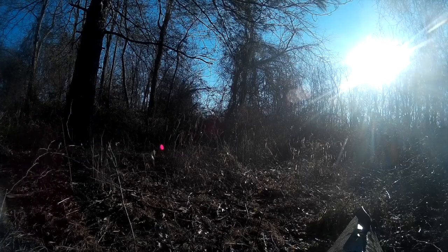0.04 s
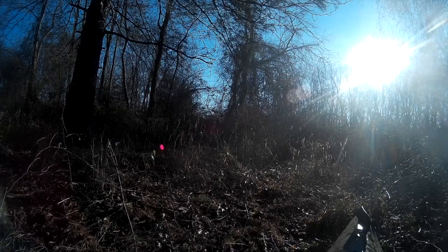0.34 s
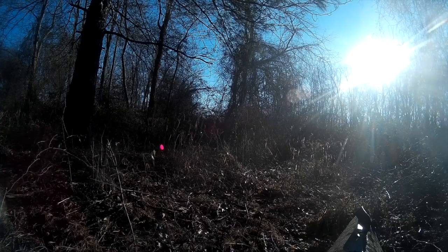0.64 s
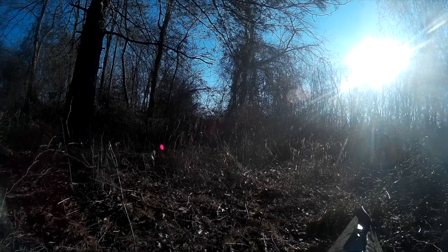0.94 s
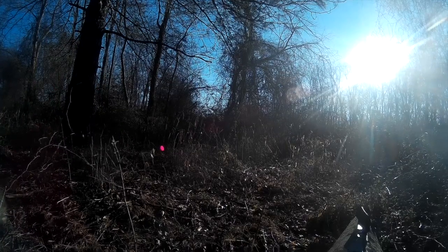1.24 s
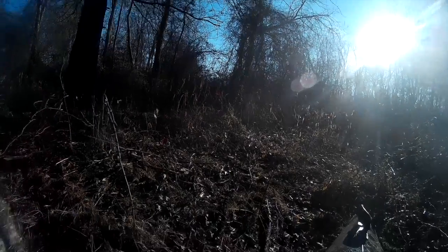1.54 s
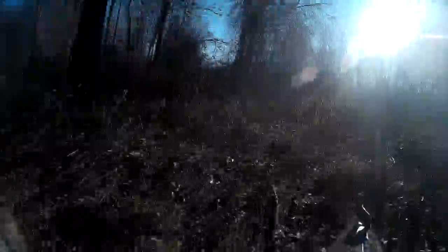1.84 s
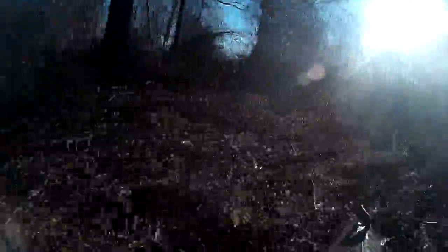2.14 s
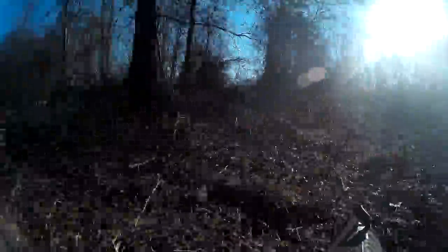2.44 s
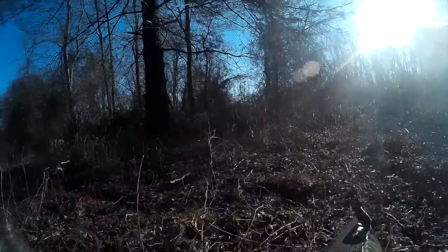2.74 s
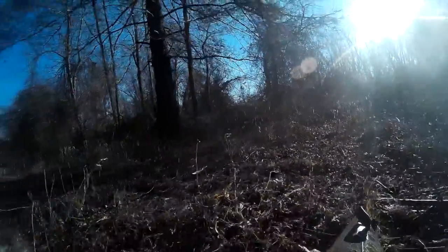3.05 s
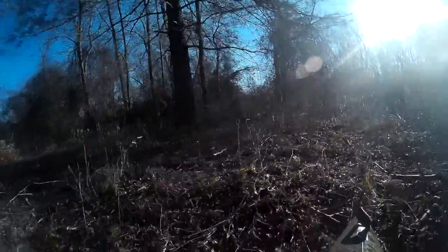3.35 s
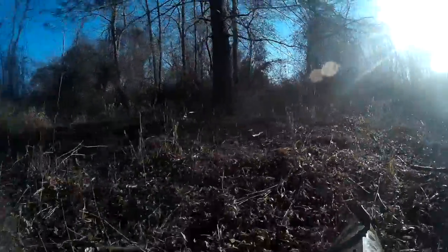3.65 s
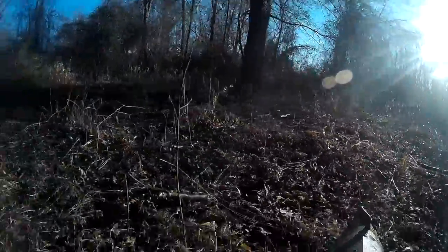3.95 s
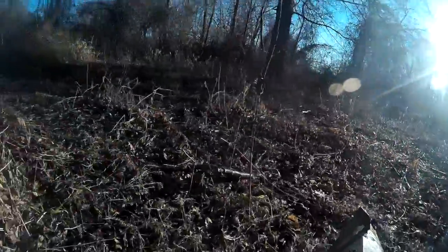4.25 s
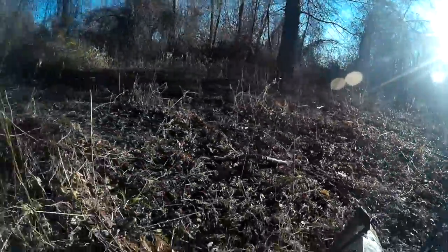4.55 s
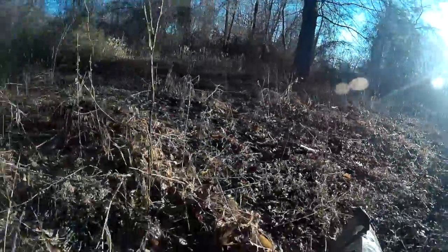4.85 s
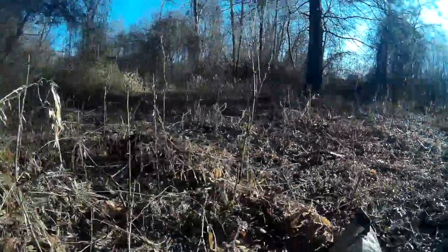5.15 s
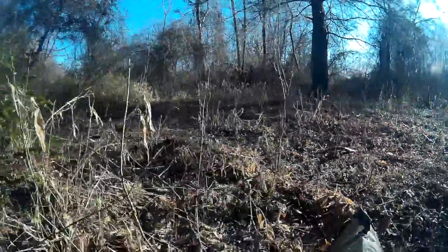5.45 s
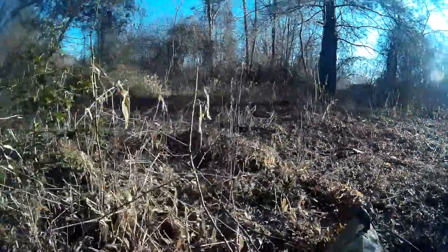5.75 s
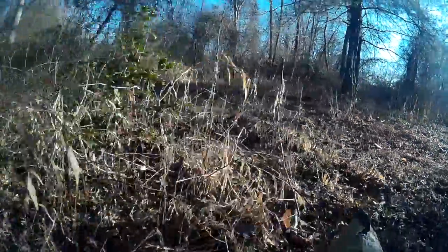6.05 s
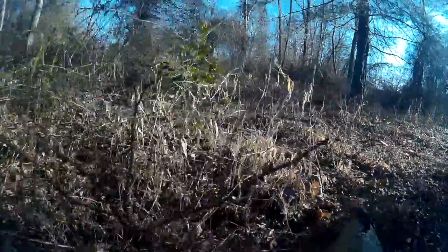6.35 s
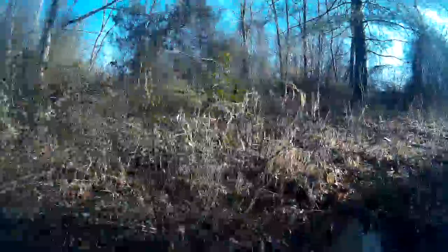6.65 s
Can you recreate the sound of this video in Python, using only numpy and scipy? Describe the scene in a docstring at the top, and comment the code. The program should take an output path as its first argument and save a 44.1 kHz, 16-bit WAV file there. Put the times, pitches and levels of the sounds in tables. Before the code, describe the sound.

A hollow plastic boat is dragged over dry leaves and brush, rumbling and thumping while twigs knock, scrape and snap very close.

```python
"""In still woods, a plastic kayak is hauled over dry leaves and brush. The microphone rides on the boat,
inside a closed camera case, so every contact is very close. The hollow hull rumbles over the ground and
booms on bumps; twigs knock and scrape along it and ring the case. Each heap of brush lifts the boat and
crushes twigs; leaves crackle faintly through the case wall."""
import sys
import numpy as np
from scipy import signal
from scipy.fft import rfft, irfft, next_fast_len
from scipy.io import wavfile
from scipy.ndimage import uniform_filter1d

SR = 44100
rng = np.random.default_rng(int(sys.argv[2]) if len(sys.argv) > 2 else 0)


def int16_out(signal):
    """Quantize to a 16-bit WAV file."""
    q = np.round(np.clip(np.atleast_2d(signal).T, -1, 1) * 32767)
    wavfile.write(sys.argv[1], SR, q.astype(np.int16))


N = 300321
TIME = np.arange(N) / SR

# Tone colours at the microphone. Each row: frequency in Hz, relative level in dB.
WOODS_SPECTRUM = [(12, -37.5), (20, -0.5), (86, 4.5), (298, -3.5), (1510, -16), (3760, -18.5),
                  (4080, -18), (4430, -19), (13000, -20.5), (14500, -27)]
RUMBLE_SPECTRUM = [(40, -17), (90, -6), (140, -2.5), (190, 4), (250, -3.5), (290, -6.5), (345, -4.5),
                   (450, -11.5), (560, -22.5), (680, -18.5), (800, -29.5), (1500, -33.5), (3000, -56.5)]  # the hull on lumpy ground
HEAVE_SPECTRUM = [(10, -18), (25, -3.5), (46, 2.5), (70, 3.5), (105, -6), (160, -17), (400, -76.5),
                  (1000, -72)]  # the whole boat heaving
RUB_SPECTRUM = [(300, -2), (600, 0), (770, -13.5), (1000, -1.5), (1250, -1), (1550, -7.5), (1900, -8),
                (2300, -17), (2950, -13.5), (3500, -22.5), (5300, -23.5), (8000, -37.5)]  # leaves rubbing underneath
LEAF_SPECTRUM = [(700, -24), (2000, -5), (3000, 0.5), (4500, 1.5), (5500, 5), (7200, 3), (8400, -1),
                 (9300, -2), (10500, 5), (12200, -2), (13500, -21.5), (15000, -9)]  # leaves crackling
SNAP_SPECTRUM = [(700, -10.5), (2500, -5.5), (5500, -1.5), (7800, 2), (9300, 0.5), (11000, 3.5), (12500, 2),
                 (14500, -11)]  # a stalk breaking

# Resonances of boat and case. Each row: frequency in Hz, width in Hz, relative level in dB.
HULL_MODES = [(109, 45, -10), (137.2, 66, -3.5), (192.6, 58, -4), (231.4, 97, -7), (340, 73, -8),
              (436, 173, -12), (566, 410, -19), (694, 210, -26.5)]
DECK_MODES = [(422, 260, 0.00079), (626, 326, 0)]
CASE_LOW_MODES = [(975, 220, -5), (1144, 433, 1.5), (1340, 313, 1.5), (1670, 384, -1), (1900, 315, 2)]
CASE_MID_MODES = [(2910, 610, 1), (3071, 524, 3.3), (3161, 730, 0.67)]
CASE_HIGH_MODES = [(3920, 330, -7), (4095, 293, -2), (4850, 400, -1.5), (5117, 349, 1.5),
                   (6300, 2200, -16.5), (6564, 490, -10.5), (8170, 700, -10.5), (9740, 900, -12.5)]
CRACK_MODES = [(1400, 2100, -1.5), (4440, 1030, 4.5), (6160, 2300, -6), (9050, 4000, -15)]  # the case under a brittle twig

# Effort of the haul. Each row: time in seconds, relative level in dB.
HAUL_EFFORT = [(0.85, -87), (1.35, -63), (1.53, -56.5), (1.86, -55.5), (2.03, -43), (2.18, -42.5),
               (2.33, -39), (2.86, -45.5), (3.09, -44.5), (3.46, -40.5), (3.57, -36.5), (3.77, -36.5),
               (4.15, -41.5), (4.58, -41.5), (4.68, -46), (4.97, -41.5), (5.08, -41.5), (5.27, -32),
               (5.35, -35), (5.48, -41.5), (5.63, -50), (5.85, -48), (6.03, -42), (6.23, -43),
               (6.58, -45.5), (6.81, -42.5)]
# Heaps of brush. Each row: start and length in seconds, boat lift and twig crushing in relative dB.
BRUSH_HEAPS = [(0.941, 0.083, -48.5, -71.5), (1.382, 0.081, -35, -53), (1.822, 0.29, -40, -62),
               (2.014, 0.046, -43, -57.5), (2.291, 0.023, -28.5, -40), (2.393, 0.025, -40, -42.5),
               (2.662, 0.066, -36.5, -54), (3.054, 0.052, -35.5, -62), (3.349, .12, -32, -47.5),
               (3.49, 0.16, -26.5, -38), (3.736, 0.1, -59, -42.5), (3.918, .35, -51, -42.5),
               (4.32, 0.2, -54, -48.5), (4.581, 0.082, -35.5, -48), (4.854, 0.25, -34, -49),
               (5.209, .16, -30, -41), (5.8, 0.39, -42, -62), (6.258, 0.068, -34, -50.5),
               (6.509, .06, -44, -51.5), (6.719, 0.099, -38, -60.5)]
# Stalks wiping the side. Each row: start and length in seconds, first and last pitch in Hz, level in dB.
STALK_SWISHES = [(2.861, 0.065, 1165, 1290, -58), (3.291, 0.14, 1273, 1684, -52.5),
                 (6.267, 0.0192, 1088, 1220, -40)]
# The loudest dry stalks breaking. Each row: start in seconds, relative level in dB.
STALK_SNAPS = [(1.398, -48), (1.456, -52.5), (1.506, -58), (2.325, -53), (2.3627, -54), (2.38, -50),
               (2.434, -50), (3.3621, -54), (3.4042, -55), (3.5033, -43), (3.5277, -43.5), (3.594, -41),
               (3.607, -41), (3.6628, -38), (3.7019, -44.5), (3.7928, -50), (3.9722, -45.5), (4.0384, -47),
               (4.148, -47), (4.2416, -43), (4.5027, -38), (4.999, -49), (5.0528, -50), (5.0924, -48),
               (5.292, -38), (5.3056, -41), (5.3146, -39.5), (5.377, -45), (5.396, -46), (5.4433, -45),
               (5.4579, -48.5), (6.2765, -48)]
# Stems sliding along the hull. Each row: start and length in seconds, relative level in dB.
STEM_SCRAPES = [(3.928, 0.012, -41), (3.938, 0.031, -28.5), (4.011, 0.017, -39), (4.047, 0.0094, -37),
                (4.087, 0.023, -47), (4.125, 0.024, -45), (4.177, .014, -29), (4.193, 0.024, -35.5),
                (4.236, 0.0436, -34.5), (4.437, 0.015, -35), (4.447, 0.01, -26.5), (4.888, 0.0057, -45.5)]
# Twigs cracking against the case. Each row: start in seconds, level of the loudest 2 ms in dB.
TWIG_CRACKS = [(1.3985, -28), (2.3025, -45), (3.6306, -28), (3.6622, -25)]
# Roots under the hull. Each row: start in seconds, level in dB, length of the push in seconds,
# brightness in dB per octave.
ROOT_BUMPS = [(0.94, -56, 0.056, 6), (1.394, -29.5, 0.012, -6), (1.442, -35, 0.028, 2.5),
              (1.846, -48.5, 0.062, 3), (2.04, -40.5, 0.051, 3.5), (2.298, -34.5, 0.062, -7.5),
              (2.668, -39.5, 0.072, 6), (3.1, -35.5, 0.0173, 3), (3.499, -39, 0.031, 10),
              (4.596, -27.5, 0.045, 4.5), (4.673, -38.5, 0.036, 8.5), (5.203, -20, 0.04, -3),
              (6.264, -30.5, 0.066, 0), (6.542, -39.5, 0.034, 1.5)]
# Drops on the keel. Each row: start in seconds, peak in dB.
KEEL_THUDS = [(1.4003, -13.5), (1.465, -19), (2.304, -25), (3.532, -15), (3.576, -21.5), (5.254, -13.5)]
# Twigs striking the boat. Each row: time in seconds, relative level in dB, leading tone in Hz,
# hardness in dB, wait for the first rebound in seconds (0 for none).
TWIG_KNOCKS = [(1.4117, -45, 1260, -16, 0), (1.4484, -24, 1320, -9.5, 0.0033),
               (1.4521, -22.5, 2140, -7, 0.014), (1.6788, -50.5, 1270, -31, 0.0085),
               (2.3105, -28.5, 1840, -12, 0.00052), (2.3245, -30.5, 1120, -16, 0.0017),
               (2.337, -25.5, 1070, -38, 0.023), (2.374, -28, 1870, -15, 0),
               (2.493, -33.5, 1400, -26, 0.012), (2.5313, -35, 1160, -28, 0.00054),
               (2.5523, -39.5, 1940, -8.5, 0), (2.672, -41.5, 1017, -13, 0),
               (3.1063, -44.5, 937, -8, 0.0024), (3.4214, -29.5, 1209, -13, 0),
               (3.4446, -32.5, 1130, -28, 0.00064), (3.4598, -20, 1800, -10, 0.004),
               (3.509, -20.5, 1900, -4.5, 0.0046), (3.545, -22.5, 1400, 4, 0.00075),
               (3.5502, -20.5, 950, -26, 0.00068), (3.563, -11, 1830, -6.5, .011),
               (3.6064, -24, 1064, -15, 0.0021), (3.6167, -24, 2005, 0.5, 0), (3.6307, -12.5, 1930, -11, 0),
               (3.663, -15.5, 2100, 7, .0123), (3.814, -35, 960, -19, .014), (3.9329, -26, 997.3, -13, 0),
               (3.947, -15.5, 1330, -12.5, 0.01), (3.979, -25, 1652, -16, 0.00084),
               (3.9926, -25, 980, -16, 0.00084), (4.0148, -19.5, 1931, -15.5, 0),
               (4.0223, -22, 1340, -23, 0.0008), (4.0516, -27, 1960, -5, 0.0028),
               (4.119, -30, 1350, -17, 0.0014), (4.134, -23.5, 1433, -8, 0.01),
               (4.174, -32, 1698, -22, 0.014), (4.2298, -29, 1977, -14, 0.00094),
               (4.2662, -33, 1350, -14, 0), (4.3178, -22.5, 1871, -24, 0.0018),
               (4.3475, -28, 1360, -8, 0.00093), (4.3629, -27, 1950, -2, 0.0019),
               (4.456, -22.5, 1900, -18, 0.0095), (4.4734, -19.5, 1984, -14, 0.0025),
               (4.5027, -16.5, 2204, .5, 0.027), (4.8932, -35, 1611, -11.5, 0),
               (4.9527, -28.5, 1840, -1, 0), (4.9582, -18.5, 1770, -37, 0.025),
               (5.0513, -19.5, 1700, -22.5, 0.0084), (5.0782, -24.5, 1088, -38, 0.0087),
               (5.227, -29.5, 980, -18, 0), (5.25, -23, 1340, -37, 0.00027),
               (5.2702, -22, 1413, -16, 0.0013), (5.2778, -18.5, 1890, -8.5, 0.028),
               (5.3022, -26, 1051, -30, 0.0082), (5.3352, -19.5, 1340, -18.5, 0.0035),
               (5.3705, -27, 1195, -33, 0.00022), (5.402, -27.5, 1120, -39, 0.00078),
               (6.2703, -37, 1056, -16.5, 0.0045)]


def amp(db):
    """Decibels to gain."""
    return 10 ** (np.asarray(db) / 20)


def unit(x):
    """Scales to rms 1."""
    return x / np.sqrt(np.mean(x ** 2) + 1e-20)


def crest(x):
    """Scales so that the strongest 2 ms have rms 1."""
    return x / np.sqrt(uniform_filter1d(x ** 2, size=88).max() + 1e-20)


def add(mix, start_s, sound):
    """Mixes a sound in at the given time."""
    part = mix[max(round(start_s * SR), 0):][:len(sound)]
    part += sound[:len(part)]


def colour(x, spectrum):
    """Minimum-phase filter with the given spectrum."""
    hz, db = np.transpose(spectrum)
    grid = abs(np.fft.fftfreq(8192, 1 / SR))
    log_gain = np.log(amp(np.interp(np.log(grid + 1), np.log(hz), db)))
    taps = np.fft.ifft(np.exp(np.conj(signal.hilbert(log_gain)))).real
    return signal.oaconvolve(x, taps[:len(taps) // 2])[:len(x)]


def wander(rate_hz):
    """Random drift of rms 1, mostly slower than the given rate."""
    size = next_fast_len(N)
    hz = np.fft.rfftfreq(size, 1 / SR)
    spectrum = rfft(rng.standard_normal(size)) / (1 + (hz / rate_hz) ** 4)
    return unit(irfft(spectrum, size)[:N])


def grains(per_s, spread_db):
    """Random clicks, mostly small, a few large."""
    size = amp(spread_db * np.minimum(rng.exponential(1, N), 4))
    return unit(size * rng.choice([-1, 1], N) * (rng.random(N) < per_s / SR))


def ring(force, modes, samples):
    """A force drives modes that swell and die; each point of contact favours different ones."""
    hz, width, db = np.transpose(modes)[:, :, None]
    t = np.arange(samples) / SR
    age = np.pi * width * t
    shapes = age ** 2 * np.exp(-age) * np.sin(2 * np.pi * (hz * t + rng.random(hz.shape)))
    motion = signal.oaconvolve(force[None], shapes, axes=1)
    gain = amp(db + 1.5 * rng.standard_normal(hz.shape))
    return (gain * motion / np.linalg.norm(motion, axis=1, keepdims=True)).sum(0)


def woods(level_db=-65.5):
    """The faint, steady hiss of still woods around the boat."""
    return amp(level_db) * unit(colour(rng.standard_normal(N), WOODS_SPECTRUM))


def heaps(rise_s=0.018, settle_s=0.064, crush_fade_s=0.054):
    """Gains for lift and crushing: the hull meets a heap fast and settles after the twigs fall quiet."""
    t = TIME[::32]
    lift, crush = np.zeros(len(t)), np.zeros(len(t))
    for start, length, lift_db, crush_db in BRUSH_HEAPS:
        rise = np.clip((t - start) / rise_s, 0, 1)
        past = np.maximum(t - start - length, 0)
        lift = np.hypot(lift, amp(lift_db) * rise * np.exp(-past / settle_s))
        crush = np.hypot(crush, amp(crush_db) * rise * np.exp(-past / crush_fade_s))
    return np.interp(TIME, t, lift), np.interp(TIME, t, crush)


def hull_rumble(effort, lift):
    """Lumpy ground shakes the hull under the microphone, and the whole boat heaves."""
    rumble_gain = np.hypot(effort * amp(3.5), lift * amp(-5.5)) * amp(-3 + 2.63 * wander(14))
    rumble = unit(colour(grains(1200, 3.32), RUMBLE_SPECTRUM))
    heave_gain = amp(-2.5) * np.hypot(effort * amp(-2) * (effort / effort.max()) ** 0.17, lift)
    heave = unit(colour(rng.standard_normal(N), HEAVE_SPECTRUM))
    return rumble_gain * rumble + heave_gain * heave


def leaves(effort, crush, brittle_db=-68):
    """Leaves rub softly under the hull and crumble where it presses hard, faint through the case wall."""
    scuffs = grains(2200, 3.0) * amp(2 * wander(40))
    rubbing = np.hypot(effort * amp(-11.5), crush) * unit(colour(scuffs, RUB_SPECTRUM))
    pressure = np.hypot(effort * amp(-29), crush * amp(-21.5))
    crumbling = unit(grains(900, 4.5) * amp(5.5 * wander(110)))
    broken_share = pressure ** 2 / (pressure ** 2 + amp(brittle_db) ** 2)
    rustle = np.sqrt(broken_share) * crumbling + np.sqrt(1 - broken_share) * grains(4000, 3.0)
    flutter = amp(0.3 - 1.1 * wander(12))
    return rubbing + pressure * flutter * unit(colour(rustle, LEAF_SPECTRUM))


def swishes(width_hz=170):
    """A stalk wipes along the plastic with a fuzzy tone that rises as it bends."""
    out, fuzz = np.zeros(N), wander(width_hz)
    for start, length, first_hz, last_hz, db in STALK_SWISHES:
        part = fuzz[int(start * SR):][:int(length * SR)]
        turns = np.cumsum(np.linspace(first_hz, last_hz, len(part))) / SR
        wipe = part * np.sin(2 * np.pi * turns) * signal.windows.tukey(len(part), .5)
        add(out, start, amp(db) * unit(wipe))
    return out


def patter(crush, taps_per_s=70):
    """Small twigs tap the hull at random, mostly in the thick heaps, and ring case and deck."""
    taps = grains(taps_per_s, 3.0)
    case = unit(ring(taps, CASE_LOW_MODES, samples=1300)[:N])
    deck = unit(ring(taps, DECK_MODES, samples=1300)[:N])
    gain = amp(1) * crush * (crush / crush.max()) ** .35
    return gain * (case + amp(-9) * deck)


def snaps(crush, decay_s=.0009, small_per_s=60):
    """Each dry stalk breaks in a tiny burst; small ones break at random in the heaps."""
    out, t = np.zeros(N), np.arange(SR // 100) / SR
    fade = np.exp(-t / decay_s)
    for start, db in STALK_SNAPS:
        burst = colour(rng.standard_normal(len(t)) * fade, SNAP_SPECTRUM)
        add(out, start, amp(db + 5) * crest(burst))
    small_fades = signal.oaconvolve(abs(grains(small_per_s, 3.0)), fade)[:N]
    small_snaps = unit(colour(small_fades * rng.standard_normal(N), SNAP_SPECTRUM))
    return out + crush * amp(-23) * small_snaps


def scrapes(slips_per_s=700, focus_hz=5100, focus_db_per_octave=5.5):
    """Fast stick and slip of a stem makes the case rasp, favouring the high modes near one pitch."""
    out, slips = np.zeros(N), grains(slips_per_s, 4.0)
    hz, width, mode_db = np.transpose(CASE_HIGH_MODES)
    high_modes = np.transpose([hz, width, mode_db - focus_db_per_octave * abs(np.log2(hz / focus_hz))])
    for start, length, db in STEM_SCRAPES:
        samples = int(length * SR)
        force = slips[int(start * SR):][:samples] + 0.056 * rng.standard_normal(samples)
        force *= signal.windows.tukey(samples, .5)
        for modes, trim_db in (CASE_LOW_MODES, -4), (CASE_MID_MODES, -15), (high_modes, -7):
            add(out, start, amp(db + trim_db) * unit(ring(force, modes, samples=500)))
    return out


def cracks(decay_s=0.0013):
    """Brittle twigs crack on the case, right at the microphone, the first as the boat jerks loose."""
    out, t = np.zeros(N), np.arange(SR // 100) / SR
    for start, db in TWIG_CRACKS:
        force = rng.standard_normal(len(t)) * np.exp(-t / decay_s)
        add(out, start, amp(db) * crest(ring(force, CRACK_MODES, samples=400)))
    return out


def bumps(thud_hz=52, thud_decay_s=0.0078):
    """Roots boom in the hollow hull, brighter on hard ground; a drop on the keel gives a low thud."""
    out, t = np.zeros(N), np.arange(SR // 5) / SR
    hz, width, mode_db = np.transpose(HULL_MODES)
    for start, db, length, tilt_db in ROOT_BUMPS:
        push = rng.standard_normal(int(length * SR))
        push *= np.linspace(1, .5, len(push))
        modes = np.transpose([hz, width, mode_db + tilt_db * np.log2(hz / hz[0])])
        boom = ring(push, modes, samples=5000)
        add(out, start, amp(db) * boom * np.sqrt(len(push)) / np.linalg.norm(boom))
    for start, db in KEEL_THUDS:
        add(out, start, amp(db) * np.sin(2 * np.pi * thud_hz * t) * np.exp(-t / thud_decay_s))
    return out


def blows(rebounds=2):
    """Yields every knock and any rebounds, each one sooner, weaker, lower and softer than the last."""
    for start, db, tone_hz, hardness_db, gap_s in TWIG_KNOCKS:
        yield start, db, tone_hz, hardness_db
        for _ in range(rebounds if gap_s > 0 else 0):
            start += gap_s
            gap_s *= 0.47
            db -= 8.5
            tone_hz *= 0.82
            hardness_db -= 24.5
            yield start, db, tone_hz, hardness_db


def knocks(grip_s=.0019, chatter_s=0.0036, lead_s=.0012, focus_db=11, boom_db=-18.5):
    """A twig grips, lets go and chatters, ringing hull, deck and the case around the microphone."""
    out, t = np.zeros(N), np.arange(-SR // 100, SR // 30) / SR
    hz, width, mode_db = np.transpose(CASE_LOW_MODES)
    swell = np.exp(-abs(t) / np.where(t < 0, grip_s, chatter_s))
    impulse = t == 0
    for start, db, tone_hz, hardness_db in blows():
        chatter = rng.standard_normal(len(t)) * swell
        soft = impulse + 0.052 * chatter
        hard = impulse + 0.041 * chatter * (t > -lead_s)
        # The twig's stiffness picks the leading mode.
        low_modes = np.transpose([hz, width, mode_db - focus_db * np.log2(hz / tone_hz) ** 2])
        deck_db = -12.5 - 1.5 * np.log2(tone_hz / hz.mean())  # thick, low twigs shake the deck more
        high_db = -22.5 + .7 * hardness_db  # hard contacts reach the high modes
        parts = [(soft, HULL_MODES, boom_db), (soft, DECK_MODES, deck_db), (soft, low_modes, 0.6),
                 (hard, CASE_MID_MODES, hardness_db), (hard, CASE_HIGH_MODES, high_db)]
        for force, modes, trim_db in parts:
            ringing = crest(ring(force, modes, samples=1800))
            add(out, start + t[0] - lead_s, amp(db + trim_db) * ringing)
    return out


def scene():
    """The moving boat, heard from on board in mono, over the hiss of the woods."""
    background = woods()
    effort = amp(np.interp(TIME, *np.transpose(HAUL_EFFORT), left=-120))
    lift, crush = heaps()
    ground = hull_rumble(effort, lift) + leaves(effort, crush) + patter(crush) + snaps(crush)
    contacts = cracks() + knocks() + scrapes() + swishes() + bumps()
    return (background + ground + contacts)[None]


def record(dry):
    """The hardest knocks overload the microphone; the treble ends at 14.5 kHz."""
    clipped = np.clip(dry, -.52, .52)
    lowpass = signal.firwin(201, 14500, window=("kaiser", 8), fs=SR)
    return signal.oaconvolve(clipped, lowpass[None], "same")


dry = scene()
out = record(dry)
int16_out(out)
```